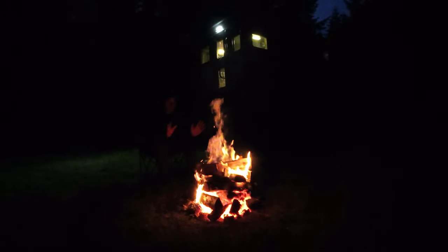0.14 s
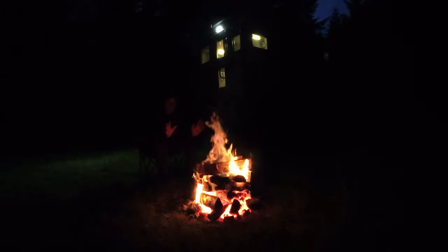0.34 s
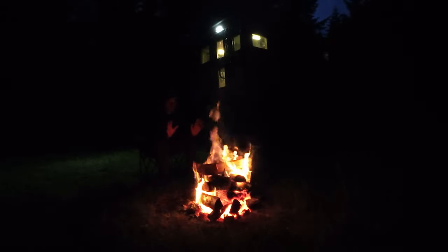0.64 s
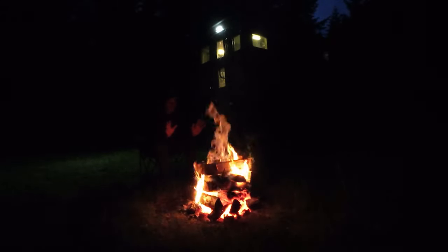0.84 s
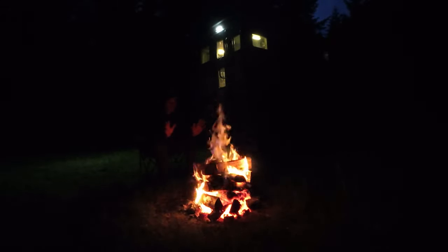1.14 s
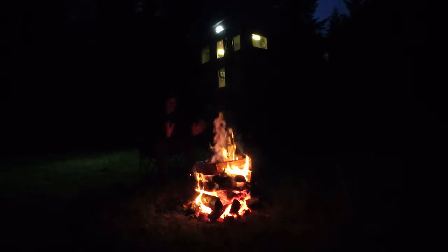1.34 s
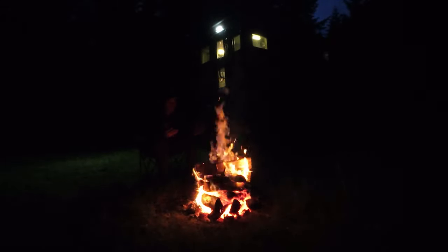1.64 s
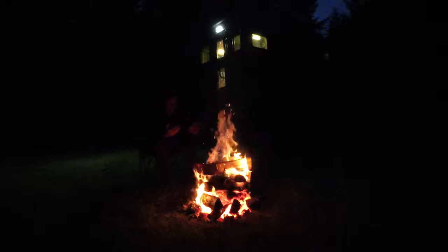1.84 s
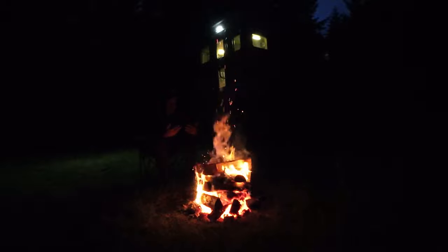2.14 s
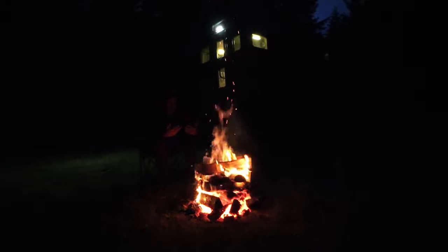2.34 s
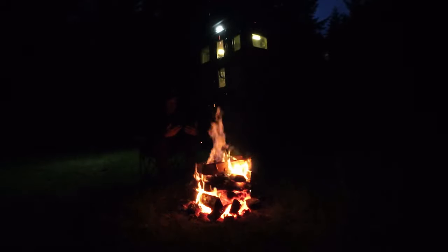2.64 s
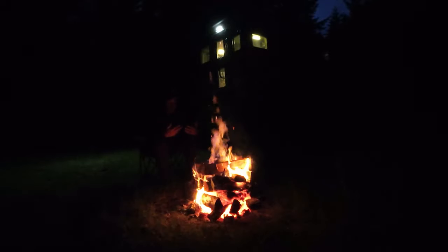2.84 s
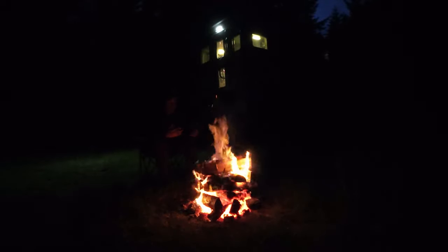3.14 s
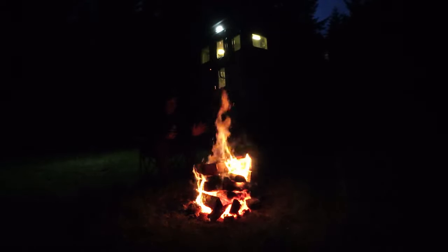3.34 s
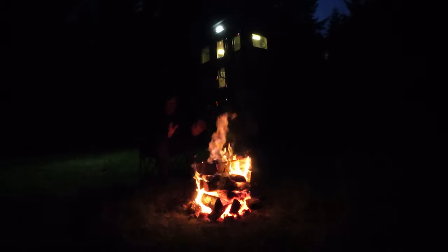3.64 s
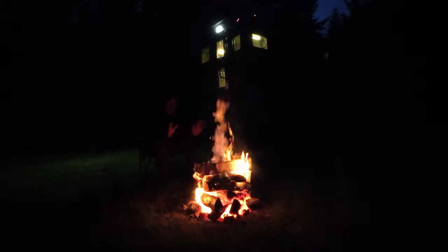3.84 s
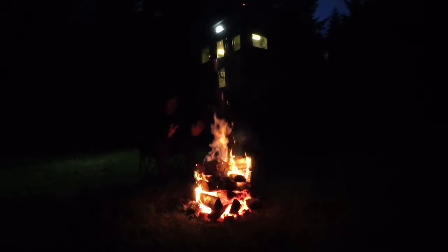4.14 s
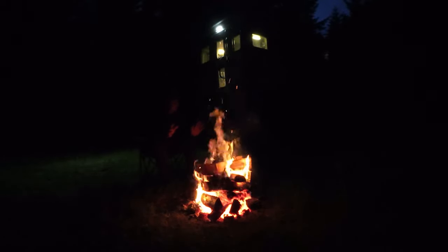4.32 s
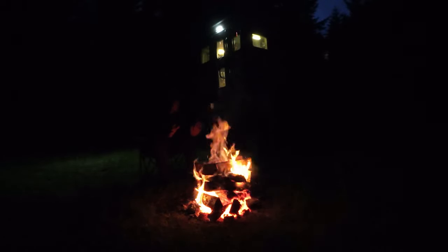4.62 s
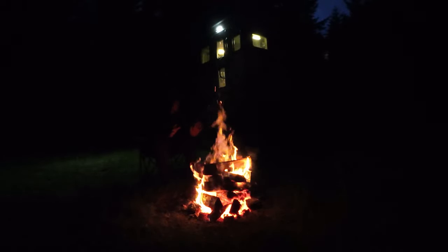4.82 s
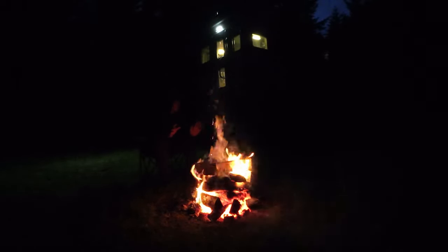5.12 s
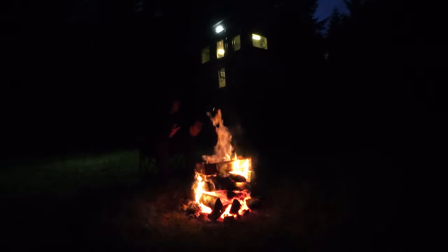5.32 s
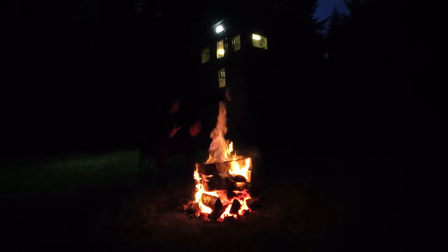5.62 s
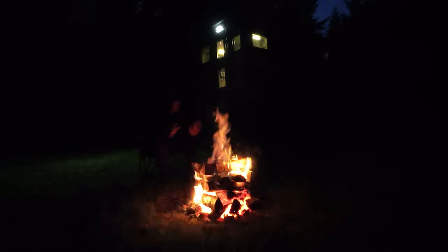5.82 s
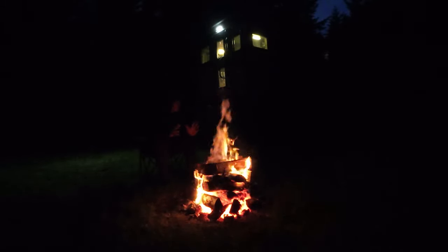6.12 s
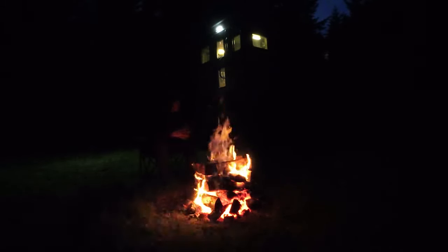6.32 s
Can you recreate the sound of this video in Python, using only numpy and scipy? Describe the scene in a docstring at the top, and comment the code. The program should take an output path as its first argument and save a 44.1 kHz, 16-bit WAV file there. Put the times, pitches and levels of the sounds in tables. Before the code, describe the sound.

Dry snaps and crackles come from a campfire a few metres away in an open yard, over a quiet flutter of flames and a faint hiss. A sharp pop comes first, then a bigger one with a low puff. Two strong cracks follow midway, echoing briefly off walls and trees. The fire then settles into small crackles and ember ticks, closing with one soft puff.

```python
"""A stacked log fire burns on a lawn at night, a few metres from a two-port microphone.
From the start flames rumble and flutter, sap hisses and embers tick. Pockets of steam and resin burst
in the wood; each pop scatters among the logs, then comes back from walls and trees. A sharp pop at
0.3 s stands out, then a bigger one at 1.6 s with a low puff of gas. The biggest land at 3.2 and 3.8 s;
lighter crackle follows, and a softer puff comes at the very end."""
import sys
import numpy as np
from scipy import signal
from scipy.io import wavfile

SR = 44100
rng = np.random.default_rng(int(sys.argv[2]) if len(sys.argv) > 2 else 0)


def generate_wav(signal):
    """Clip the signal to [-1, 1] and save it as 16-bit WAV at the path in sys.argv[1]."""
    frames = np.transpose(np.atleast_2d(signal))
    scaled = np.clip(frames, -1, 1) * 32767
    pcm = np.round(scaled).astype(np.int16)
    wavfile.write(sys.argv[1], SR, pcm)


N = 285406


def from_db(db):
    """Decibels to gain."""
    return 10 ** (np.asarray(db) / 20)


def unit(x):
    """Scaled to rms 1."""
    return x / np.sqrt(np.mean(x ** 2) + 1e-20)


def at_hz(points, hz):
    """Reads a (frequency, value) curve on a log frequency axis."""
    freqs, values = np.transpose(points)
    return np.interp(np.log(hz), np.log(freqs), values)


def band(x, low_hz, high_hz, order=2):
    """Butterworth band-pass."""
    edges = np.clip([low_hz, high_hz], 10, .45 * SR)
    return signal.sosfilt(signal.butter(order, edges, "band", fs=SR, output="sos"), x)


def drift(rate_hz):
    """A smooth random modulator, rms 1."""
    hop, run_in = 40, 2000
    pole = np.exp(-2 * np.pi * rate_hz * hop / SR)
    noise = rng.standard_normal(N // hop + run_in + 2)
    slow = signal.lfilter([1], [1, -2 * pole, pole * pole], noise)[run_in:]
    return np.interp(np.arange(N) / hop, np.arange(len(slow)), unit(slow))


# Stereo image of the bed: (frequency [Hz], left-right correlation [1 = mono])
BED_IMAGE = [(25, 0.6), (60, 1), (130, 0.97), (290, .92), (640, 0.28), (3000, .55), (7000, 1), (15000, 1)]

def noise_bed(spectrum, flutter_db, flutter_hz):
    """Stereo noise in half-octave bands that flicker partly together, partly alone; rms 1."""
    out, shared_flutter = 0, drift(flutter_hz)
    bottom_hz, top_hz = spectrum[0][0], spectrum[-1][0]
    edges = bottom_hz * np.sqrt(2) ** np.arange(2 * np.log2(top_hz / bottom_hz) + 1)
    white = rng.standard_normal((2, 2, N + SR))  # a second of pre-roll
    for k, (low, high) in enumerate(zip(edges, edges[1:])):
        mid, side = band(white[k % 2], low, high)[:, SR:]
        hz = np.sqrt(low * high)
        alike = at_hz(BED_IMAGE, hz)
        stereo = np.sqrt(1 + alike) * mid + np.sqrt(1 - alike) * side * [[1], [-1]]
        flutter = shared_flutter + 0.5 * drift(flutter_hz)
        out = out + from_db(at_hz(spectrum, hz) + flutter_db * flutter) * stereo
    return unit(out)


# Tone of the flames: (frequency [Hz], relative spectral density [dB])
FLAME_TONE = [(15, 0.5), (30, -1), (50, 3.5), (85, -3), (160, -10.5), (290, -18), (500, -29), (900, -54.5)]

def flame_rumble():
    """The low end of the bed: flames rumbling with a light flutter."""
    return from_db(-54) * noise_bed(FLAME_TONE, flutter_db=1.05, flutter_hz=23)


# Tone of the sap: (frequency [Hz], relative spectral density [dB])
SAP_TONE = [(300, -8.5), (700, 4.5), (1700, 2.5), (3000, -2), (4500, -4), (5500, 1), (7000, -1.5),
            (10500, 2), (15500, 0), (17000, -16.5)]

def sap_hiss():
    """The air on top of the bed: a thin, restless hiss of sap."""
    return from_db(-69.5) * noise_bed(SAP_TONE, flutter_db=3, flutter_hz=24)


# Fader ride on the embers: (time [s], level [dB])
EMBER_FADER = [(0.0, -65), (0.699, -73.5), (1.301, -70.5), (2.399, -71.5), (3.2, -74), (4.5, -76),
               (5.1, -70), (5.7, -78.5), (6.47, -71.5)]

def ember_ticks():
    """Embers tick faintly in random clumps; each tick is a grain of noise in one of five colours."""
    ticks_per_s, decay_s = 120, .0008
    sizes = from_db(4.5 * np.minimum(rng.exponential(1, N), 3))
    triggers = rng.random(N) < ticks_per_s * from_db(4 * drift(3)) / SR
    colour = rng.integers(0, 5, N)
    noise = rng.standard_normal(N)
    ticks, pole = 0, np.exp(-1 / (decay_s * SR))
    for k, hz in enumerate(np.geomspace(2500, 10000, 5)):
        envelope = signal.lfilter([1], [1, -pole], sizes * triggers * (colour == k) + 1e-18)
        ticks = ticks + band(noise * envelope, hz / 2.6, hz * 4.2, order=1)
    fader_db = np.interp(np.arange(N) / SR, *np.transpose(EMBER_FADER))
    return from_db(fader_db) * unit(ticks)


# Low puffs of burning gas: (time [s], level before panning [dB], 1 / length [Hz])
GAS_PUFFS = [(1.591, -28.5, 43.57), (6.449, -42, 40.3)]

def gas_puffs():
    """Burning gas gives one soft suck and swell of air, panned a little right."""
    out, t = np.zeros(N), np.arange(N) / SR
    for start_s, level_db, hz in GAS_PUFFS:
        progress = np.clip((t - start_s) * hz, 0, 1)
        out -= from_db(level_db) * np.sin(2 * np.pi * progress ** .2) * np.sin(np.pi * progress ** .5)
    return out * from_db([[-1.5], [1.5]])


def yard_tail(layers):
    """The diffuse tail from house and trees swells and dies; each layer of a pop takes its own paths."""
    predelay_s, swell_s, t60_s = .018, .012, .79
    t = np.arange(SR) / SR
    envelope = from_db(-57 - 60 * t / t60_s) * np.clip((t - predelay_s) / swell_s, 0, 1)
    envelope *= from_db(1.5 * drift(120)[:SR])  # trunks and walls answer in small lumps
    noise = rng.standard_normal((3, len(layers), SR))
    narrow_stereo = noise[0] + 0.26 * noise[1:]
    response = band(narrow_stereo * envelope, 300, 11900, order=1)
    return signal.fftconvolve(layers[None], response, axes=2)[:, :, :N].sum(axis=1)


def wall_slap(send):
    """One bright slapback, slightly smeared by the rough wall."""
    delay_s, t60_s = .0325, .04
    t = np.arange(SR // 10) / SR
    envelope = from_db(-48 - 60 * (t - delay_s) / t60_s) * (t > delay_s)
    response = band(envelope * rng.standard_normal((2, len(t))), 1500, 12000, order=1)
    return signal.fftconvolve(send[None], response, axes=1)[:, :N]


def log_scatter(send):
    """Tight early reflections among the logs, some ten milliseconds long."""
    peak_s, t60_s = .0046, .025
    t = np.arange(SR // 10) / SR
    envelope = from_db(-40.5 - 60 * abs(t - peak_s) / t60_s) * (t > .001)
    response = band(envelope * rng.standard_normal(len(t)), 330, 13000, order=1)
    return signal.fftconvolve(send, response)[:N]


def pop_layers(split, spread_oct, snap_hz, thud_db, crack_db, fizz_db):
    """One pop in four layers: snap, crack and fizz of splitting wood, and the thud of the gas's push."""
    push_s, fizz_low_hz = .00038, 8330
    t = np.arange(split.shape[1]) / SR
    width = 2 ** spread_oct
    push = np.exp(-(t / push_s - 1.5) ** 2)
    snap = unit(band(split[0], snap_hz / width, min(snap_hz * width, fizz_low_hz)))
    thud = unit(band(push, 114, 1020))
    crack = unit(band(split[1], 926, 2750))
    fizz = unit(band(split[2], fizz_low_hz, 14400))
    return from_db([[0], [thud_db], [crack_db], [fizz_db]]) * [snap, thud, crack, fizz]


# Cue list of wood pops; the faint one at 0.36 s is the sharp pop's slap off a wall.
# The last four columns are relative to the snap level:
# (time [s], snap level [dB], snap pitch [Hz], thud [dB], crack [dB], fizz [dB], echo send [dB])
POP_CUES = [(0.1053, -61, 6640, -35, -33, 2, 5), (0.2259, -39, 6250, -24, -17.5, -1.5, -13),
            (0.2592, -57, 6900, -32, -7, 13, 9.5), (0.284, -64, 5200, -11, -10, -10, -3),
            (0.2933, -61.5, 6200, -21, -12, -2, -4.5), (0.3258, -27, 5740, -18, -13.5, 1.5, -6.5),
            (0.3626, -55, 5260, -16, -19, -9, -7), (0.4402, -60, 6600, -23, -9, 2, -7),
            (0.4662, -68, 5800, -19, -30, 14, -4), (0.5434, -66.5, 4900, -17, 0, 7, 0),
            (0.632, -54, 4900, -32, -8, -3, 7), (0.6896, -61, 5930, -10, -19, -2, 3),
            (0.7009, -57, 5700, -12, -9, 6, -1), (0.756, -56.5, 5600, -25, -12, 5, 7),
            (0.7601, -62.5, 6000, -9, -9, 6, 11), (1.0074, -59.5, 5600, -30, 6, 7, -11),
            (1.1, -43, 5800, -29, -15, 7.5, -7.5), (1.1923, -34.5, 5100, -10, -9.5, -33, -6),
            (1.2628, -63.5, 4800, -14, -1, -5, -1), (1.315, -52.5, 3500, -1, -3.5, -10.5, 0.5),
            (1.325, -52.5, 4730, -25, -0.6, -2.5, -3.5), (1.3373, -62, 5400, -14, -5.5, 2, -9.5),
            (1.5711, -22, 4100, -7.5, -4.5, -7.5, -0.55), (1.6627, -53.5, 4860, -15, -17, 8.5, -13),
            (1.71, -56.5, 5200, -11.5, 1.5, 13, 2.5), (1.8144, -51.5, 6000, -30.5, -16, -1, -0.5),
            (1.9786, -58, 5600, -30, -2, 6.5, 4), (2.0171, -34, 4040, -16.5, -4.5, -10.5, 1),
            (2.0205, -48, 4640, -26, -14, -17, 0), (2.0951, -62, 5500, -20.5, -12, 4, 5),
            (2.102, -52.5, 3935, -3.5, -2.5, -16, 9.5), (2.1096, -38, 5200, -22, -6, 4, -3),
            (2.126, -60.5, 6500, -18, -10, 9, 0), (2.1321, -57.5, 6600, -14, -26, -5, 1),
            (2.155, -70, 6500, -15, 0, 9, 0), (2.1892, -44, 4240, -29.5, -29, 1, -3),
            (2.216, -42.5, 6000, -16, -4, 11.5, -0.5), (2.3394, -54, 6430, -23.5, -6, 10, 4),
            (2.392, -65, 5000, -21, -1, -12, -6.5), (2.4215, -66.5, 6500, -20, -14.5, 5.5, 3),
            (2.7232, -53, 5130, -28.5, -11, -7, -4.5), (2.8671, -73, 4070, 12.5, 10, 0.5, -1),
            (3.0187, -63, 5600, -16.5, -20.5, 3.5, -1), (3.051, -62.5, 5370, -19, -5, 3.5, 2),
            (3.1145, -60.5, 5650, -12, -6, -6, -1), (3.1442, -60.5, 6740, -24, -9, 8.5, -3.5),
            (3.1972, -21, 3900, -17, -8.5, -14, -2), (3.2016, -32.5, 3500, -38, -16, -4, 3),
            (3.378, -52, 6170, -15.5, -19, 9, 3), (3.3894, -59.5, 6430, -19, -9, 5, 1),
            (3.4791, -41, 5870, -26, -18, 4, -7.5), (3.5141, -62, 4450, -1, 9.5, 7, -3),
            (3.5508, -62.5, 5770, -10, -14, 1.5, -3.5), (3.5603, -59, 4870, -5, 1, 5.5, -1),
            (3.5906, -57.5, 4640, -26, -7, -1.5, -2), (3.7665, -19, 4190, -11, -10, -26, 2),
            (3.9749, -57.5, 6230, -2, -12, 7.5, 12), (4.0674, -60.5, 5050, -16, -5, 5.5, 11.5),
            (4.1313, -61, 6700, -17, -7.5, 14.5, -1.5), (4.164, -53.5, 5800, -22.5, -4.5, 11, 4.5),
            (4.264, -61, 4640, -8, -4.5, -7.5, -0.5), (4.3832, -60.5, 5000, -13.5, -5.5, -3, 0),
            (4.432, -50.5, 5400, -26.5, -1.5, 10, 0), (4.636, -61, 5805, -7, -11.5, 1.5, -1.5),
            (4.7576, -72, 4880, -10.5, 8, 18.5, -10.5), (4.83, -56.5, 5620, -23.5, -6.5, -4.5, -4.5),
            (4.906, -64, 5370, -13.5, -15.5, 0, -2.5), (4.9801, -46.5, 5740, -16, -16, 5.5, -7.5),
            (4.984, -62, 5690, -11, -14.5, 12, -2.5), (5.1562, -53, 4980, -18.5, -1.5, 1.5, 3.5),
            (5.1994, -62.5, 5580, -27, -4, 5.5, 9), (5.275, -66, 7420, -17.5, -5.5, 11.5, 1),
            (5.448, -61, 4240, -20, -6.5, 1.5, 14.5), (5.493, -62.5, 7530, -21.5, -34.5, 6.5, 6.5),
            (5.6501, -48, 6240, -29.5, -15.5, -3, -2), (5.6536, -54, 5600, -16, -7.5, -23.5, 5),
            (5.7302, -60.5, 5870, -16.5, -32, 6, 5), (5.8228, -64.5, 3590, -18, 0.5, -13, -4),
            (6.0729, -38, 6160, -32.5, -17.5, 0, -5), (6.2472, -58.5, 4720, -14, -6, 0.5, 6),
            (6.2713, -62, 5880, -21.5, 0, 10, 3), (6.329, -54.5, 6550, -30.5, -28, -3, 1.5),
            (6.415, -54, 5600, -11, -14.5, 1, 10.5)]

def wood_pops():
    """Steam and resin burst the wood: gives the dry pops, a log and wall send and a layered yard send."""
    length, rise_s, t60_s = 400, .0002, .0024
    t = np.arange(length) / SR
    direct, near_send = np.zeros((2, N + length))
    yard_send = np.zeros((4, N + length))
    envelope = t / rise_s * from_db(-60 * t / t60_s)  # a millisecond of uneven splitting
    splits = rng.standard_normal((len(POP_CUES), 3, length)) * envelope
    click = np.tile(signal.unit_impulse(length), (3, 1))  # gives the pop's mean colour all round
    previous_s = -1
    for (start_s, level_db, snap_hz, *mix_db, send_db), split in zip(POP_CUES, splits):
        start = round(start_s * SR)
        span = slice(start, start + length)
        # a split that follows another at once rings narrower
        spread_oct = .2 if start_s - previous_s < .0065 else .77
        previous_s = start_s
        # a pop deep in the pile snaps lower and sends more to logs and wall
        depth_db = -11 * np.log2(snap_hz / 4500)
        pop = pop_layers(split, spread_oct, snap_hz, *mix_db).sum(axis=0)
        direct[span] += from_db(level_db) * pop
        near_send[span] += from_db(level_db + send_db + depth_db) * pop
        clean_layers = pop_layers(click, spread_oct, snap_hz, *mix_db)
        yard_send[:, span] += from_db(level_db + send_db) * clean_layers
    return direct[:N], near_send[:N], yard_send[:, :N]


def scene():
    """The mix: pops up front, their echoes behind, the fire's bed underneath."""
    pops, near_send, yard_send = wood_pops()
    echoes = log_scatter(near_send) + wall_slap(near_send) + yard_tail(yard_send)
    bed = flame_rumble() + sap_hiss() + ember_ticks()
    return bed + gas_puffs() + echoes + pops


# Treble notches of the microphone ports, left then right: (centre [Hz], width [Hz], gain [dB])
PORT_NOTCHES = [
    [(12450, 1600, -21), (14100, 1500, -7)],
    [(5600, 1700, -4.8), (9000, 1500, -5), (13900, 2100, -14)],
]

def record(dry):
    """Each port colours the treble in its own way; a steep high cut takes off the top."""
    out = dry.copy()
    for channel, notches in enumerate(PORT_NOTCHES):
        for hz, width_hz, gain_db in notches:
            tuning = -2 * np.cos(2 * np.pi * hz / SR)
            width, root_gain = np.pi * width_hz / SR, from_db(gain_db / 2)
            feedforward = [1 + width * root_gain, tuning, 1 - width * root_gain]
            feedback = [1 + width / root_gain, tuning, 1 - width / root_gain]
            out[channel] = signal.lfilter(feedforward, feedback, out[channel])
    high_cut = signal.cheby2(12, 70, 17200, fs=SR, output="sos")
    return signal.sosfilt(high_cut, out)


dry = scene()
out = record(dry)
generate_wav(out)
```